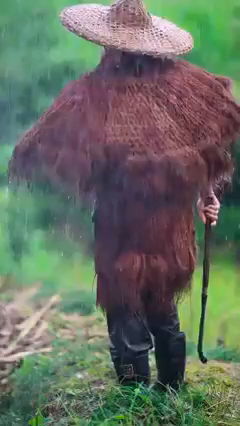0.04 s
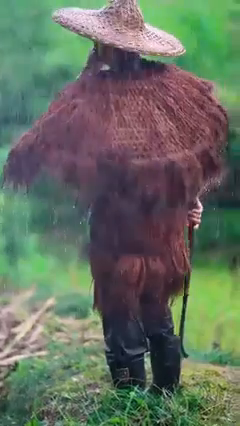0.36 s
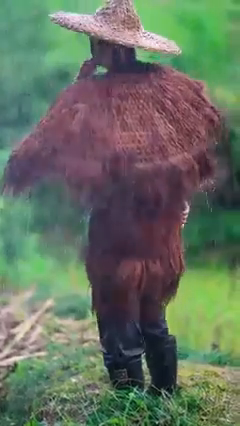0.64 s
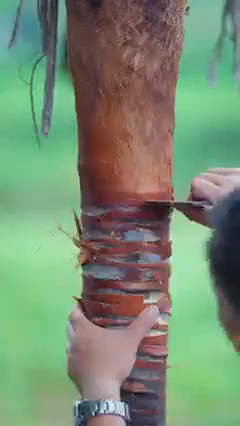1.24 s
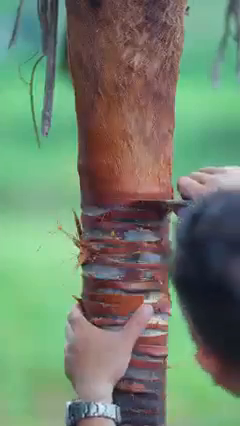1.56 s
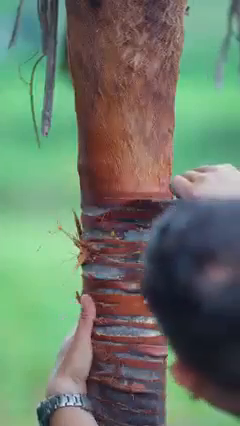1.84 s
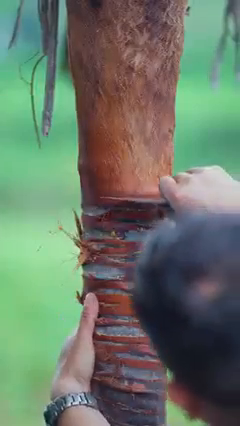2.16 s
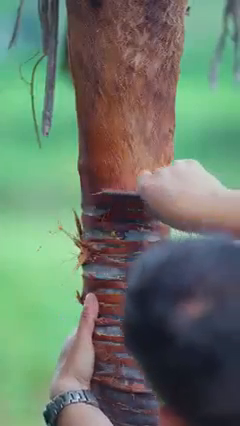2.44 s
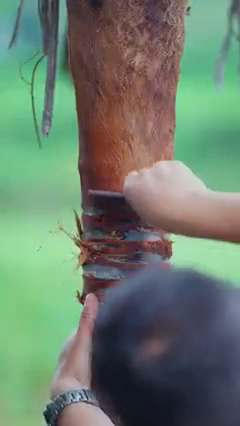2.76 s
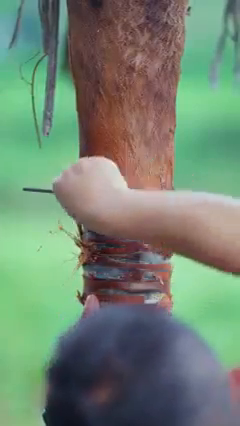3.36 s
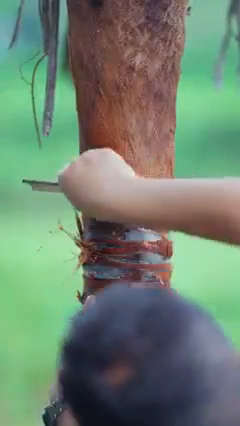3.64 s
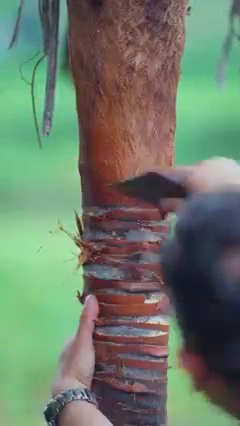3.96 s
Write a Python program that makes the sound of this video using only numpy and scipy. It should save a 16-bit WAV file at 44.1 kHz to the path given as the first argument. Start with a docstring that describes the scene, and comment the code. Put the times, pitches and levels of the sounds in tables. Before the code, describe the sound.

A knife scrapes and rips through a palm trunk's dry fibres after brief rain.

```python
"""Outdoors beside a palm, the microphone close to the trunk. Steady rain stops abruptly; then a knife
cuts round the trunk through its fibrous sheath. The blade picks at the fibres, sticks and judders
against the trunk, rips through a bundle, scrapes on lightly and slips off with a short steel ring.
Birds whistle far away in the open air, heard mostly through the trees."""
import sys
import numpy as np
from scipy import signal
from scipy.fft import rfft, irfft, next_fast_len
from scipy.io import wavfile
from scipy.ndimage import uniform_filter1d, map_coordinates

SR = 44100
rng = np.random.default_rng(int(sys.argv[2]) if len(sys.argv) > 2 else 0)


def inscribe(sig):
    """Save sig as 16-bit PCM at rate SR to the path in sys.argv[1].

    A 1-D sig is mono; a 2-D sig holds one channel per row.
    Samples are clipped to [-1, 1] before scaling.
    """
    pcm = np.round(np.clip(np.atleast_2d(sig).T, -1, 1) * 32767)
    wavfile.write(sys.argv[1], SR, pcm.astype(np.int16))


N = 176400
T = np.arange(N) / SR
RAIN_START_S, RAIN_STOP_S = 0.151, 1.122


def amp(db):
    return 10 ** (np.asarray(db) / 20)


def unit(x):
    return x / np.sqrt(np.mean(x ** 2) + 1e-20)


def along(points, hz):
    """Read a curve of (freq_hz, value) points on a log frequency axis."""
    point_hz, values = np.transpose(points)
    return np.interp(np.log(hz + 1), np.log(point_hz + 1), values)


def level(points):
    """Gain per sample from (time_s, level_db) points, silent outside them."""
    time_s, db = np.transpose(points)
    return amp(np.interp(T, time_s, db)) * (T >= time_s[0]) * (T <= time_s[-1])


def filtered(x, response):
    """Pass x through a filter whose gain is response(hz)."""
    size = next_fast_len(N + 8192)
    return irfft(rfft(x, size) * response(np.fft.rfftfreq(size, 1 / SR)), size)[..., :N]


def coloured(x, spectrum):
    """x shaped by (freq_hz, gain_db) points, at rms 1."""
    return unit(filtered(x, lambda hz: amp(along(spectrum, hz))))


def bell(hz, centre_hz, width_octaves, skirt_db):
    """Gain of a bell-shaped band standing on a flat skirt."""
    return np.exp(-0.5 * (np.log2(hz / centre_hz) / width_octaves) ** 2) + amp(skirt_db)


def add(track, start_s, sound):
    part = track[round(start_s * SR):][:len(sound)]
    part += sound[:len(part)]


def wobble(knots_per_s):
    """A smooth random curve."""
    knots = rng.standard_normal(int(N * knots_per_s / SR) + 4)
    return map_coordinates(knots, [T * knots_per_s], mode="mirror")


def grains(per_s, spread_db, life_s):
    """Tiny decaying bursts of noise at random times and of random size, at rms 1."""
    onsets = rng.random(N) < per_s / SR
    sizes = onsets * amp(spread_db * np.clip(rng.standard_normal(N), -2, 2))
    power = signal.lfilter([1], [1, -np.exp(-2 / (life_s * SR))], sizes ** 2)
    return unit(np.sqrt(power) * rng.standard_normal(N))


def ring(modes, t, scatter_db):
    """Damped modes whose levels vary a little from blow to blow."""
    return sum(amp(db + scatter_db * rng.standard_normal() - 60 * t / t60) * np.sin(2 * np.pi * hz * t)
               for hz, db, t60 in modes)


def air(level_db=-50):
    """Quiet outdoor background once the rain has gone."""
    # Colour of the open air: freq_hz, gain_db
    colour = [(30, -10), (237, -2), (443, 4), (1590, 1), (3070, -13.5), (4090, -6), (4660, -4),
              (12600, -43), (15500, -10)]
    return amp(level_db) * (T > RAIN_STOP_S) * coloured(rng.standard_normal(N), colour)


def trees(x, width):
    """The surrounding trees scatter a sound back as a short, diffuse stereo tail."""
    # Decay among the trees: freq_hz, t60_s
    decay = [(200, 0.6), (2500, 0.3)]
    hz, t, noise = signal.stft(rng.standard_normal((2, SR // 2)), SR, nperseg=256)
    tail = signal.istft(noise * amp(-60 * t / along(decay, hz)[:, None]), SR, nperseg=256)[1]
    mid, side = signal.fftconvolve(x[None], tail / np.linalg.norm(tail[0]), axes=1)[:, :N]
    return np.array([mid + width * side, mid - width * side])


def rain(level_db=-24.5, lean_right_db=0.5, stop_fade_s=0.012):
    """A dense wash of drops all round the microphone, widest in the treble."""
    # Colour of the drops: freq_hz, gain_db
    colour = [(40, -40.5), (136, -22.5), (287, -19), (377, -8), (472, -9.5), (653, -0.5), (1190, -2.5),
              (4130, -11), (6640, -15), (9890, -20.5), (12100, -27), (15500, -37)]
    # Stereo width: freq_hz, side_re_mid_db
    width = [(100, -15), (300, -8.5), (700, -11.5), (2000, -12), (5000, 0), (10000, -5.5)]
    mid, side = (coloured(grains(per_s=6300, spread_db=-1.5, life_s=0.0017), colour) for _ in range(2))
    side = filtered(side, lambda hz: amp(along(width, hz)))
    gate = (T > RAIN_START_S) * np.clip((RAIN_STOP_S - T) / stop_fade_s, 0, 1)
    balance = amp([[-lean_right_db], [lean_right_db]])
    return amp(level_db) * gate * np.array([mid + side, mid - side]) * balance


def bird_whistles(waver=0.009, flutter_db=2, overtone_db=-26):
    """Far birds give slurred, overlapping whistles, unsteady in pitch and level."""
    # Whistles: start_s, length_s, start_hz, middle_hz, end_hz, level_db
    whistles = [(1.19, 0.12, 1980, 2090, 2020, -43), (1.24, .05, 2050, 1850, 1620, -45),
                (1.267, 0.02, 2700, 2550, 2420, -38.5), (1.295, 0.099, 3020, 3100, 3040, -47),
                (1.27, 0.35, 1570, 1810, 1480, -47), (1.739, 0.037, 2755, 2830, 2850, -37),
                (1.766, 0.064, 3150, 3380, 3540, -42), (2.65, .04, 2700, 2750, 2800, -43),
                (2.675, 0.11, 2300, 2210, 2170, -37), (2.735, .1, 1800, 2180, 2260, -35),
                (2.815, 0.09, 2210, 2130, 2080, -32), (2.89, 0.055, 2100, 1780, 1550, -38),
                (2.95, 0.075, 1770, 1800, 1800, -39), (2.98, .045, 3350, 2980, 2800, -41),
                (2.985, .13, 1900, 2350, 2380, -40), (3.135, 0.11, 2250, 2060, 1930, -38),
                (3.22, 0.16, 1950, 1800, 1730, -43), (3.416, 0.15, 2500, 2610, 2530, -45.5)]
    out = np.zeros(N)
    for start_s, length_s, start_hz, middle_hz, end_hz, db in whistles:
        progress = np.linspace(0, 1, int(length_s * SR))
        glide = np.polyfit([0, 0.5, 1], [start_hz, middle_hz, end_hz], 2)
        hz = np.polyval(glide, progress) * (1 + waver * wobble(330)[:len(progress)])
        phase = 2 * np.pi * np.cumsum(hz) / SR
        tone = np.sin(phase) + amp(overtone_db) * np.sin(2 * phase)
        swell = np.sqrt(np.abs(np.sin(np.pi * progress)))
        add(out, start_s, amp(db) * swell * tone)
    return out * amp(flutter_db * wobble(110))


def bird_chorus(level_db=-51.5, chatter_db=5):
    """After the rain, many distant birds blur into flickering patches of noise."""
    # Colour of the chorus: freq_hz, gain_db
    colour = [(1100, -43), (1600, -3.5), (2100, -3), (3000, 6), (3800, -9), (5000, -11.5)]
    noise = signal.stft(rng.standard_normal(N), nperseg=512)[2]
    patches = uniform_filter1d(rng.standard_normal(noise.shape), size=3, axis=0)  # smooth in frequency
    patches = unit(uniform_filter1d(patches, size=12, axis=1))  # and in time
    chatter = signal.istft(noise * amp(chatter_db * patches), nperseg=512)[1][:N]
    return amp(level_db) * (T > RAIN_STOP_S) * coloured(chatter, colour)


def shaves():
    """The flat of the edge rubs and shaves dry fibres: each stroke swells and fades as a grainy hiss. The very
    narrow 2.44 kHz stroke just after 2.0 s is instead a brief squeal of the blade."""
    # Strokes: start_s, length_s, level_db, centre_hz, width_octaves
    strokes = [(1.31, 0.12, -38, 10000, 0.61), (2.012, 0.05, -29.5, 2440, .05),
               (2.062, 0.11, -32.5, 690, 0.81), (2.232, .055, -27, 2480, 0.063),
               (3.21, 0.1, -34.5, 9100, 0.23), (3.22, 0.087, -34.5, 2880, 0.12),
               (3.341, 0.077, -42, 7400, 0.15), (3.414, 0.18, -32.5, 10300, 0.37),
               (3.781, 0.16, -32, 5970, 0.37), (3.854, 0.077, -27.5, 6940, 1)]
    out, fibres = np.zeros(N), grains(per_s=1900, spread_db=5.5, life_s=0.003)
    for start_s, length_s, db, centre_hz, width_octaves in strokes:
        rub = fibres[round(start_s * SR):][:int(length_s * SR)]
        hz = np.fft.rfftfreq(len(rub), 1 / SR) + 1
        hiss = unit(irfft(rfft(rub) * bell(hz, centre_hz, width_octaves, skirt_db=-30), len(rub)))
        add(out, start_s, amp(db) * hiss * np.sin(np.linspace(0, np.pi, len(rub))))
    return out


def rasp():
    """The edge catches countless fibres: a light scrape, and a coarser rip where it bites deep."""
    # Light scraping over dry fibres: time_s, level_db
    scrape_levels = [(1.12, -41.5), (1.28, -41), (1.38, -42), (1.43, -46), (1.58, -42), (1.69, -40),
                     (1.81, -37), (1.835, -57), (1.87, -36), (1.92, -40.5), (2.6, -59), (2.72, -71),
                     (2.765, -42.5), (2.83, -46.5), (2.885, -36), (2.92, -51), (3.12, -55.5), (3.19, -39.5),
                     (3.265, -34), (3.325, -46), (3.37, -37.5), (3.415, -45), (3.47, -38.5), (3.53, -32.5),
                     (3.565, -36), (3.58, -49), (3.66, -48), (3.71, -36), (3.80, -36), (3.85, -47.5),
                     (3.93, -36.5), (3.98, -43.5)]
    # Colour of the scrape: freq_hz, gain_db
    scrape_colour = [(60, -25), (300, -0.5), (750, 4), (1500, -4), (2900, 2.5), (4200, 1.5), (7000, -3),
                     (9000, -1.5), (12000, -7.5), (15500, -6)]
    # Ripping through a bundle: time_s, level_db
    rip_levels = [(1.91, -62), (1.935, -32), (2.0, -33.5), (2.045, -30.5), (2.08, -37), (2.12, -27),
                  (2.165, -34), (2.19, -34), (2.205, -21), (2.224, -34), (2.24, -23), (2.34, -22),
                  (2.378, -24.5), (2.41, -25.5), (2.43, -30.5), (2.462, -31), (2.50, -33), (2.56, -40.5),
                  (2.65, -45), (3.80, -64), (3.85, -37.5), (3.875, -26.5), (3.91, -24), (3.93, -58),
                  (3.97, -41)]
    # Colour of the rip: freq_hz, gain_db
    rip_colour = [(29, -48), (65, -17), (131, -23), (333, -6.5), (551, -10), (652, -2), (935, -5),
                  (1250, 0), (3030, -2.5), (6080, -4), (13400, -15.5), (15500, -11)]
    crackle = amp(-4) * grains(per_s=170, spread_db=4, life_s=0.0007)  # single fibres stand out
    scrape = coloured(grains(per_s=900, spread_db=8.5, life_s=0.0067) + crackle, scrape_colour)
    rip = coloured(grains(per_s=700, spread_db=0.5, life_s=0.0079) + crackle, rip_colour)
    return level(scrape_levels) * scrape + level(rip_levels) * rip


def snaps(attack_s=0.00063, release_s=0.0014, low_cut_hz=350):
    """Each thick fibre gives way in a short burst with its own colour."""
    # Snapping fibres: start_s, level_db, length_s, centre_hz, width_octaves
    fibres = [(1.163, -29, 0.0041, 5470, 6.3), (1.236, -30.5, 0.0053, 5400, 1.7),
              (1.502, -28, 0.0022, 4760, 1), (1.5354, -26.5, 0.0012, 6640, 0.29),
              (1.702, -27, 0.0017, 5460, 0.085), (1.738, -25.5, 0.0021, 5400, 0.076),
              (1.917, -28, 0.0026, 5050, .12), (1.942, -18, 0.0014, 5040, 0.18),
              (1.952, -23, 0.0018, 5130, 0.18), (1.962, -30, .002, 2980, 1.4),
              (2.122, -24, 0.0016, 4500, 1.6), (2.143, -20, 0.0039, 4500, 1),
              (2.177, -24, 0.0021, 2600, 0.13), (2.196, -17.5, 0.0045, 3770, 0.74),
              (2.230, -18, 0.007, 4000, 1.6), (2.238, -11.5, 0.0019, 2940, 1.6),
              (2.244, -21, 0.016, 3530, 2.6), (2.2635, -13, 0.003, 3320, 1.1), (2.28, -18, .004, 2800, 2.2),
              (2.288, -13, 0.0067, 3300, 1.2), (2.296, -16.5, 0.016, 4500, 1.2),
              (2.329, -20.5, 0.0092, 3400, 1.2), (2.3462, -10.5, 0.0039, 3770, 1.1),
              (2.351, -15.5, 0.0091, 2150, 1.2), (2.385, -13.5, 0.0075, 3630, 1.4),
              (2.398, -21.5, 0.018, 4040, 1.2), (2.621, -37.5, 0.0047, 2980, 0.59),
              (3.227, -25.5, 0.0032, 6450, 1.7), (3.267, -26, 0.0014, 3730, 0.8),
              (3.527, -30, 0.0029, 6150, 1.6), (3.558, -24.5, 0.0031, 6600, 1.1),
              (3.689, -26, 0.0072, 6000, 1.5), (3.7208, -20, 0.0018, 5500, 0.61),
              (3.729, -27, 0.0097, 4250, 1.2), (3.7757, -20, 0.0013, 5940, 0.25),
              (3.783, -19.5, 0.0013, 4830, 0.57)]
    out, t = np.zeros(N), np.arange(2048) / SR
    hz = np.fft.rfftfreq(len(t), 1 / SR) + 1
    for start_s, db, length_s, centre_hz, width_octaves in fibres:
        colour = bell(hz, centre_hz, width_octaves, skirt_db=-24) * hz / np.hypot(hz, low_cut_hz)
        burst = unit(irfft(rfft(rng.standard_normal(len(t))) * colour))
        envelope = np.minimum(t / attack_s, 1) * np.exp(-np.maximum(t - length_s, 0) / release_s)
        add(out, start_s, amp(db) * burst * envelope)
    return out


def cracks(rise_s=0.0002):
    """A hard fibre parts at once and flicks the steel, which rings for an instant."""
    # Hard fibres parting: start_s, level_db
    fibres = [(1.9598, 6), (3.8423, 1)]
    # Modes of the flicked blade: pitch_hz, level_db, t60_s
    blade_modes = [(2900, -15, .003), (5250, -4, .005), (6400, -3, .003), (7600, -6, .003),
                   (11000, -14, .003)]
    out, t = np.zeros(N), np.arange(SR // 20) / SR
    for start_s, db in fibres:
        add(out, start_s, amp(db) * ring(blade_modes, t, scatter_db=1) * (1 - np.exp(-t / rise_s)))
    return out


def judder(rise_s=0.0028, low_cut_hz=115):
    """The wedged blade sticks and slips, and the trunk thuds at each jerk."""
    # Jerks on the trunk: start_s, level_db
    jerks = [(1.9232, -21), (1.9302, -17.5), (1.9372, -17.5), (1.9481, -16), (1.9516, -9.5), (1.9737, -11),
             (1.988, -15), (1.9977, -15), (2.0066, -16.5), (2.0255, -13)]
    # Modes of the trunk: pitch_hz, level_db, t60_s
    trunk_modes = [(182, -12, 0.05), (218, -8, 0.057), (275, 0, 0.055), (316, -4, 0.045), (417, -17, .04)]
    thuds, t = np.zeros(N), np.arange(SR // 8) / SR
    attack = 1 - np.exp(-(t / rise_s) ** 2)
    for start_s, db in jerks:
        add(thuds, start_s, amp(db) * ring(trunk_modes, t, scatter_db=5) * attack)
    return signal.sosfilt(signal.butter(4, low_cut_hz, "high", fs=SR, output="sos"), thuds)


def squeal():
    """Grainy stick-slip friction makes the wedged steel squeal in its resonances."""
    # Course of the squeal: time_s, level_db
    squeal_levels = [(1.9, -54), (1.93, -24.5), (1.955, -20.5), (1.98, -28.5), (2.005, -23.5),
                     (2.06, -34.5), (2.09, -52)]
    # Resonances of the wedged blade: centre_hz, width_hz, gain_db
    resonances = [(1240, 1250, -3.5), (2785, 160, 2.5), (5140, 610, -1)]

    def steel(hz):
        return sum(amp(db) * (1j * hz * width / (centre ** 2 - hz ** 2 + 1j * hz * width)) ** 2
                   for centre, width, db in resonances)

    friction = grains(per_s=900, spread_db=1.5, life_s=0.003)
    return level(squeal_levels) * unit(filtered(friction, steel))


def slip_off(rise_s=0.001, grit=0.3, skid_band_hz=(2500, 8000), skid_decay_s=0.007):
    """The edge grates free in short skids; each rings the blade, roughened by the fibres it brushes."""
    # Slips of the edge: start_s, level_db
    slips = [(3.8815, -10.5), (3.899, -8), (3.9085, -10)]
    # Modes of the freed blade: pitch_hz, level_db, t60_s
    blade_modes = [(1345, -25, .2), (2445, -7, .045), (3556, -3, .045), (3646, 0, .055), (4000, -11, .03),
                   (4640, -10, .08), (4930, -10, .035), (5896, -24, .12), (6380, -10, .03),
                   (7300, -13, .03), (10165, -17, .12)]
    out, t = np.zeros(N), np.arange(SR // 5) / SR
    band = signal.butter(2, skid_band_hz, "band", fs=SR, output="sos")
    for start_s, db in slips:
        skid = unit(signal.sosfilt(band, rng.standard_normal(len(t)))) * np.exp(-t / skid_decay_s)
        steel = ring(blade_modes, t, scatter_db=3.5) * (1 - np.exp(-t / rise_s))
        add(out, start_s, amp(db) * (amp(-9) * skid + steel))
    return out * (1 + grit * wobble(900))


def scene():
    """The knife is close and central, the birds distant and mostly heard through the trees."""
    knife = rasp() + shaves() + snaps() + cracks() + judder() + squeal() + slip_off()
    birds = bird_whistles() + bird_chorus()
    far_birds = amp(-3) * birds + amp(-1) * trees(birds, width=0.15)
    return rain() + air() + far_birds + knife + amp(-25.5) * trees(knife, width=0.014)


def record(dry, top_hz=15900):
    """The treble dips slightly from 8 kHz and falls away near 16 kHz."""
    # Overall tone colour: freq_hz, gain_db
    colour = [(30, -1.5), (90, 0.5), (7000, 0), (8000, -2), (14800, -3), (15800, -20)]
    return filtered(dry, lambda hz: amp(along(colour, hz)) * (hz < top_hz))


dry = scene()
out = record(dry)
inscribe(out)
```